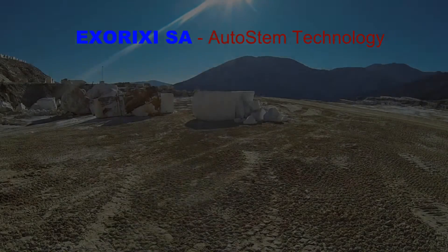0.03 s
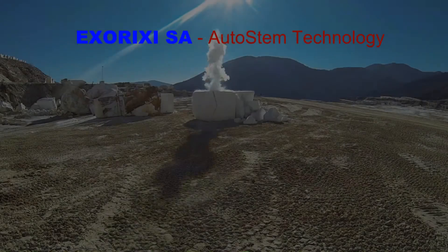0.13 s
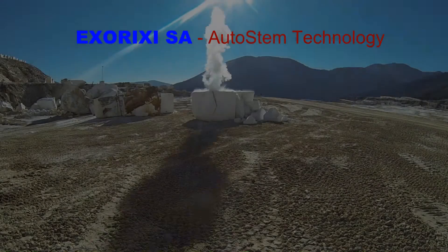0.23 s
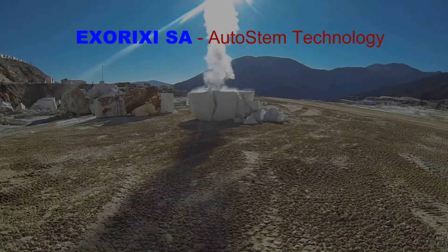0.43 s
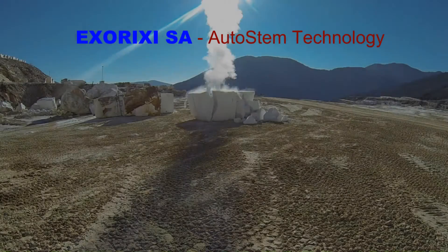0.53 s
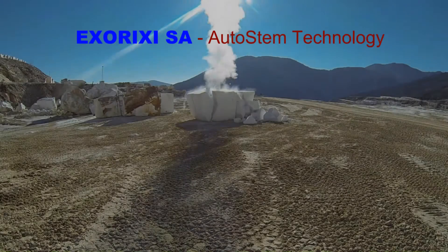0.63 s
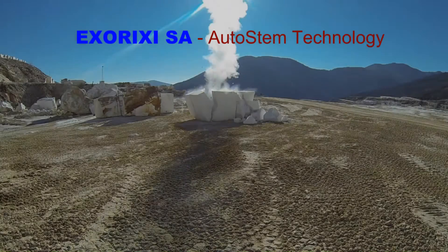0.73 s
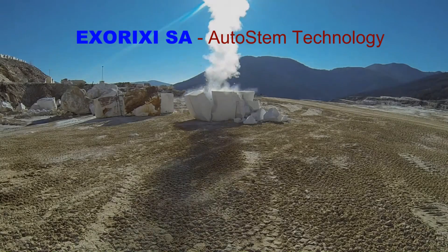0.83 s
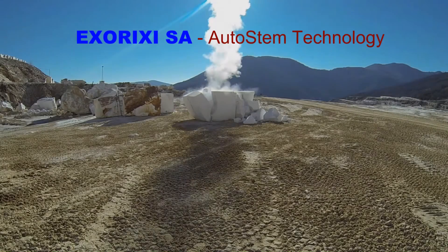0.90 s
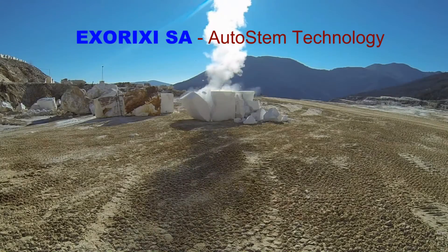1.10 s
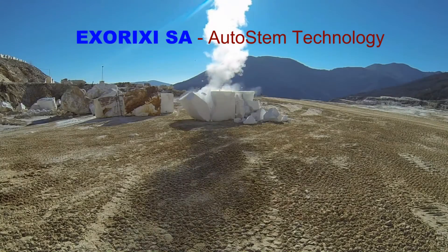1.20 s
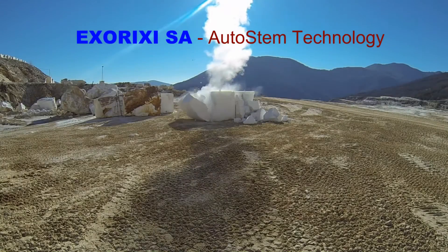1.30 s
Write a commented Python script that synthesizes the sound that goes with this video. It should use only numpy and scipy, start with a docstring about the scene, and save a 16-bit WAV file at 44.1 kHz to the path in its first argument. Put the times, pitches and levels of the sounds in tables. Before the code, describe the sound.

A small blast: a sharp double bang, then echoes and a fading rumble in a quarry.

```python
"""An open quarry, with a faint wind and a thin whine. A small charge splits a stone block: two shock
waves make a sharp double bang that overloads the microphone, and a few tones ring on after it.
A quarter of a second later the nearest rock face reflects both bangs; farther faces add weaker pairs
of echoes, dulled by absorption in the air. Rubble and rough walls scatter the sound into a rumbling tail."""
import sys
import numpy as np
from scipy import signal
from scipy.fft import rfft, irfft
from scipy.io import wavfile
from scipy.ndimage import uniform_filter1d

SR = 44100
rng = np.random.default_rng(int(sys.argv[2]) if len(sys.argv) > 2 else 0)


def bounce(signal):
    """Save signal as a 16-bit WAV file at the path given by the first command-line argument."""
    frames = np.transpose(np.atleast_2d(signal))
    limited = np.clip(frames, -1, 1)
    pcm = np.round(limited * 32767).astype(np.int16)
    wavfile.write(sys.argv[1], SR, pcm)


N = 59535
T = np.arange(N) / SR
HZ = np.fft.rfftfreq(8192, 1 / SR)

# The two bangs of the charge. Each row: start in seconds, gain in dB.
BANGS = [(0.2041, -8.5), (0.2339, -6.5)]


def amp(db):
    """Amplitude ratio: a factor of ten for every 20 dB."""
    return 10 ** (np.asarray(db) / 20)


def unit(x):
    """Normalisation to an rms of 1."""
    return x / np.sqrt(np.mean(x ** 2) + 1e-20)


def spectrum_db(points, hz=HZ):
    """Interpolation of a spectrum on a logarithmic frequency axis."""
    f, db = np.transpose(points)
    return np.interp(np.log(hz + 1), np.log(f + 1), db)


def envelope(times, db):
    """Amplitude envelope, linear in decibels between its points and silent before the first."""
    return amp(np.interp(T, times, db)) * (T >= times[0])


def colour(x, db):
    """Minimum-phase filtering at unit energy, with the spectral shape db at the frequencies HZ."""
    log_gain = np.log(amp(np.maximum(db, -100)))
    log_response = signal.hilbert(np.r_[log_gain, log_gain[-2:0:-1]]).conj()
    taps = np.fft.ifft(np.exp(log_response)).real[:len(HZ)]
    return signal.fftconvolve(x, taps / np.linalg.norm(taps))[:len(x)]


def air_absorption(x, db_per_khz_s, neutral_s):
    """Treble loss grows with path length: the sound is brighter before neutral_s and duller after."""
    hz, t, frames = signal.stft(x, SR, nperseg=256)
    loss_db = db_per_khz_s * np.minimum(hz, 7000)[:, None] / 1000 * np.clip(t - neutral_s, -.4, .6)
    return signal.istft(frames * amp(-loss_db), SR, nperseg=256)[1][:N]


def reflections(per_s, spread_db):
    """Diffuse reflection: a Poisson train of impulses of uneven size."""
    pressure, size, chance = rng.standard_normal(N), rng.standard_normal(N), rng.random(N)
    return unit(pressure * amp(spread_db * np.clip(size, -2, 2)) * (chance < per_s / SR))


def waver(window, length=N):
    """A moving average over window samples turns white noise into a slow fluctuation of rms 1."""
    return unit(uniform_filter1d(rng.standard_normal(length), size=window))


def tone(hz):
    """Frequency modulation: the phase of a sine is the integral of its changing frequency."""
    return np.sin(2 * np.pi * np.cumsum(hz) / SR)


def wind():
    """Faint wind and hiss: steady broadband noise, strongest at low frequencies."""
    # The wind's spectrum. Each row: frequency in Hz, relative level in dB.
    spectrum = [(12, -15.5), (20, -8.5), (280, -37), (320, -36), (2200, -44), (3440, -43), (3830, -48.5),
                (4980, -48.5), (5390, -54), (10200, -67), (11000, -52), (14300, -80), (22000, -120)]
    return amp(-60) * unit(colour(rng.standard_normal(N), spectrum_db(spectrum)))


def whine():
    """Beating: two faint high tones, close in frequency, waver together until the first bang."""
    # The pair of tones. Each row: frequency in Hz, rms level in dB.
    tones = [(4985, -91), (5050, -90)]
    drift_hz = 30 * waver(window=400)
    return sum(amp(db) * unit(tone(hz + drift_hz)) for hz, db in tones) * (T < BANGS[0][0])


def bangs():
    """Each shock wave is one steep-fronted cycle of pressure, with a crack of damped modes and grit."""
    # Resonances of the crack. Each row: frequency in Hz, relative level in dB, time to fall 60 dB in seconds.
    modes = [(746, -2.9, 0.022), (1032, 0, 0.0141), (1380, 4.5, 0.012), (1873, 2, 0.0072),
             (2325, 5.7, 0.015), (2665, 1.9, 0.014), (2848, -5, 0.0343), (3960, -14.5, 0.0206),
             (4560, -16, 0.014), (5905, -5, 0.0058), (7210, -11.5, 0.0055), (10150, -13, 0.0075)]
    cycle_s, front_share, hold_s, grit_decay_s = 0.00487, 1.01, 0.0035, 0.018
    t, out = T[:SR // 20], np.zeros(N)
    turn = np.minimum(t / cycle_s, 1)
    phase = 2 * np.pi * turn
    shock = -amp(-4.5) * (np.sin(phase) + front_share * (1 - turn) * np.cos(phase))
    crack = -sum(amp(db - 60 * t / t60) * np.sin(2 * np.pi * hz * t) for hz, db, t60 in modes)
    crack *= np.interp(t, [hold_s, hold_s + 0.00041], [1, .17])  # drops abruptly after its hold
    grit = amp(-27.5) * rng.standard_normal(len(t)) * np.exp(-t / grit_decay_s)
    for start, db in BANGS:
        add(out, start, amp(db) * (shock + crack + grit))
    return out


def near_scatter():
    """Scattering from the ground and loose blocks arrives at once; air absorption soon dulls it."""
    # Spectrum of the scattered sound. Each row: frequency in Hz, relative level in dB.
    spectrum = [(18, -58), (30, -9), (53, 0), (157, -6.5), (211, -1.5), (321, -8.5), (382, -11.5),
                (514, -19), (626, -9.5), (745, -19.5), (977, -21), (1080, -9.5), (1220, -11), (1860, -11),
                (2970, -12), (4990, -26), (9250, -29.5), (10200, -29), (11000, -65.5), (14300, -100),
                (22000, -120)]
    # Its envelope. Each row: time in seconds, level in dB.
    levels = [(0.203, -73), (0.209, -44.5), (0.232, -26.5), (.243, -34.5), (0.312, -31.5), (0.328, -36.5),
              (.44, -38.5), (.52, -55), (.65, -84)]
    wash = unit(colour(reflections(per_s=9000, spread_db=2.5), spectrum_db(spectrum)))
    return air_absorption(wash * envelope(*np.transpose(levels)), db_per_khz_s=10.5, neutral_s=0.11)


def ringing():
    """Damped oscillation: wavering tones swell from the second bang and decay exponentially."""
    # Each row: frequency in Hz, level in dB, time to fall 60 dB in seconds, rise time in seconds.
    tones = [(385.4, -39, 0.71, .008), (603, -40, .3, 0.0095), (1070, -35.5, 0.46, 0.0052),
             (1884, -41, 1, 0.056)]
    pitch_spread = 0.0071
    t, out = T[:SR // 2], np.zeros(N)
    for hz, db, t60, rise_s in tones:
        pitch = hz * (1 + pitch_spread * waver(window=500, length=len(t)))
        swell = 1 - np.exp(-t / rise_s)
        add(out, BANGS[1][0], amp(db - 60 * t / t60) * swell * tone(pitch))
    return out


def drone_and_boom():
    """Amplitude modulation: a low drone and a deep boom swell and fade after the blast, pitch wavering."""
    # Envelopes of the two tones. Each row: time in seconds, rms level in dB.
    drone_levels = [(.235, -69), (.26, -46.5), (.43, -42), (0.581, -36), (.64, -66), (.72, -49),
                    (0.799, -44), (.86, -64), (0.932, -43), (1.0, -71), (1.101, -64.5)]
    boom_levels = [(.24, -51), (.30, -56), (.43, -53), (.48, -34.5), (.58, -47), (.66, -42), (.73, -40.5),
                   (.78, -71), (.86, -57), (.92, -44), (0.979, -58), (1.151, -53.5), (1.35, -66)]
    drone_hz, boom_hz, waver_hz = 214.8, 57, 4
    out = np.zeros(N)
    for hz, levels in ((drone_hz, drone_levels), (boom_hz, boom_levels)):
        pitch = hz + waver_hz * waver(window=900)
        out += unit(tone(pitch)) * envelope(*np.transpose(levels))
    return out


def far_scatter():
    """Diffuse reflection from the rough walls draws both bangs out into a long rumble and clatter."""
    # Spectrum of the scattered sound. Each row: frequency in Hz, relative level in dB.
    spectrum = [(18, -45), (30, -29), (53, -5), (95, 1.5), (182, -8.5), (216, -5), (329, -18.5), (626, -21),
                (726, -26), (1080, -15), (1680, -17), (2000, -23.5), (2260, -19.5), (2900, -23.5),
                (3120, -34), (3900, -30.5), (4990, -47), (6710, -41.5), (8380, -79), (11000, -49),
                (14300, -105), (22000, -120)]
    # Its envelopes. Each row: time in seconds, rumble level in dB, clatter level in dB.
    levels = [(0.427, -43.5, -51.5), (.46, -44, -39), (.52, -39, -37), (0.602, -41, -38.5),
              (.66, -39.5, -42), (0.689, -44.5, -47.5), (.80, -45.5, -47), (.93, -44.5, -48.5),
              (1.0, -52.5, -49), (1.149, -47.5, -54.5), (1.19, -63, -58.5), (1.30, -50.5, -58.5),
              (1.35, -62, -54.5)]
    crossover_hz, pair_s = 356, .0366
    arrivals = reflections(per_s=2200, spread_db=3.5)
    arrivals = arrivals + 0.85 * np.roll(arrivals, round(pair_s * SR))  # once for each bang
    low_share = 1 / (1 + (HZ / crossover_hz) ** 8)
    rumble, clatter = (unit(colour(arrivals, spectrum_db(spectrum) + 10 * np.log10(share + 1e-9)))
                       for share in (low_share, 1 - low_share))
    times, rumble_db, clatter_db = np.transpose(levels)
    clatter = air_absorption(clatter * envelope(times, clatter_db), db_per_khz_s=3, neutral_s=0.57)
    return rumble * envelope(times, rumble_db) + clatter


def echoes():
    """Reflection: each rock face returns both bangs as crack and thump; long paths dull and blur them."""
    # The rock faces, nearest first. Each row: arrival in seconds, spacing of the pair in seconds,
    # crack gain in dB, thump gain in dB, decay time of the smear in seconds, treble lift in dB.
    faces = [(.4664, .0356, 1, -12, .009, 0), (.5433, .0364, -10.5, -21, .008, -4),
             (.6110, .0359, -16, -38, .005, 12), (.7005, .0270, -25, -36, .010, 0),
             (.7495, .0365, -24, -35, .009, 0), (.8265, .0335, -27, -44, .010, 0),
             (.8425, .0340, -24, -29, .007, 0), (.9015, .0364, -19.5, -32, .009, -2),
             (.9835, .0330, -26, -30, .012, 0), (1.0565, .0320, -25, -30, .012, 0),
             (1.1175, .0395, -22, -37, .008, -4)]
    # Hollow resonances of the nearest face.
    # Each row: frequency in Hz, relative level in dB, time to fall 60 dB in seconds.
    modes = [(277, -6.5, 0.097), (426, -5, 0.048), (501, -4, 0.049), (710, -15, 0.019), (980, -2, 0.059),
             (1130, -4.5, 0.075), (1194, -4.5, 0.098), (1560, -27, .025), (1890, 3, 0.028),
             (2220, 6, 0.037), (2686, 6, 0.028), (2805, 4.5, 0.024), (3490, 4, 0.018), (3720, -15, 0.023)]
    # The bright nearest echo and the rounder far slaps. Each row: frequency in Hz, relative level in dB.
    near_spectrum = [(100, 12), (300, 1), (1000, 3), (1450, -1), (3000, -5.5), (3700, 1), (4500, -10.5),
                     (6700, -12.5), (8000, -30.5), (11000, -28)]
    far_spectrum = [(100, 0), (250, 8.5), (400, -18), (850, -12), (1130, 12.5), (1400, 3), (2000, 12),
                    (2900, 4.5), (4000, 0.5), (6500, -22.5), (8000, -12), (11000, -48)]
    snap_share, blur_s_per_s, treble_hz = 0.033, .004, 4020
    air_db_per_khz_s, air_from_hz = 7, 850
    thump_hz, thump_decay_s = 152, 0.0059
    t, out = T[:SR // 10], np.zeros(N)
    ring = -sum(amp(db - 60 * t / t60) * np.cos(2 * np.pi * hz * t) for hz, db, t60 in modes)
    snap = -np.sqrt(snap_share) * (t == 0)
    for start, pair_s, crack_db, thump_db, smear_s, treble_db in faces:
        extra_s = start - faces[0][0]  # travel time beyond that of the first echo
        lift_db = treble_db * HZ ** 4 / (HZ ** 4 + treble_hz ** 4)
        smear = rng.standard_normal(len(t)) * np.exp(-t / smear_s)
        hit = amp(-1.5) * (snap + np.sqrt(1 - snap_share) * smear / np.linalg.norm(smear))
        if extra_s == 0:
            crack = colour(hit + 0.026 * ring, spectrum_db(near_spectrum) + lift_db)
        else:
            loss_db = air_db_per_khz_s * np.maximum(HZ - air_from_hz, 0) / 1000 * extra_s
            attack = np.minimum(t / (blur_s_per_s * extra_s), 1)
            crack = colour(hit * attack, spectrum_db(far_spectrum) + lift_db - loss_db)
        thump_attack = 1 - np.exp(-t / (0.0005 + 0.003 * extra_s))
        thump = -thump_attack * np.exp(-t / thump_decay_s) * np.cos(2 * np.pi * thump_hz * t)
        for delay in (0, pair_s):
            add(out, start + delay, amp(crack_db) * crack + amp(thump_db) * thump)
    return out


def add(mix, start, sound):
    """Superposition: a sound joins the mix at start seconds."""
    part = mix[round(start * SR):][:len(sound)]
    part += sound[:len(part)]


def side_signal(hits):
    """Decorrelation: scatter and wind differ at two microphone ports; the housing colours hits unequally."""
    # Stereo width of the near and the far sounds. Each row: frequency in Hz, side gain in dB.
    near_width = [(100, -55.5), (600, -31.5), (2500, -33), (6000, -18.5), (10000, -16)]
    far_width = [(100, -44), (1000, -49.5), (2500, -45), (4500, -30), (10000, -13.5)]
    port_decay_s = 0.00032
    hz, t = np.fft.rfftfreq(N, 1 / SR), T[:SR // 200]
    port = rng.standard_normal(len(t)) * np.exp(-t / port_decay_s)
    near = near_scatter() + amp(1) * signal.fftconvolve(hits, port / np.linalg.norm(port))[:N]
    far = far_scatter() + wind()
    near_gain, far_gain = amp(spectrum_db(near_width, hz)), amp(spectrum_db(far_width, hz))
    return irfft(rfft(near) * near_gain + rfft(far) * far_gain, N)


def scene():
    """Mid-side stereo: nearly everything arrives from straight ahead, and the treble spreads a little."""
    hits = bangs() + echoes()
    mid = hits + near_scatter() + far_scatter() + drone_and_boom() + ringing() + wind() + whine()
    side = side_signal(hits)
    return np.array([mid + side, mid - side])


def record(dry):
    """Saturation: the overloaded microphone flattens the bangs; a low-pass filter then limits the band."""
    overload, cutoff_hz = .49, 10800
    clipped = dry / (1 + (dry / overload) ** 8) ** (1 / 8)
    clipped *= amp([[-.2], [.2]])  # the right channel is slightly louder
    low_pass = signal.firwin(255, cutoff_hz, window=("kaiser", 8), fs=SR)
    return signal.oaconvolve(clipped, low_pass[None], "same")


dry = scene()
out = record(dry)
bounce(out)
```